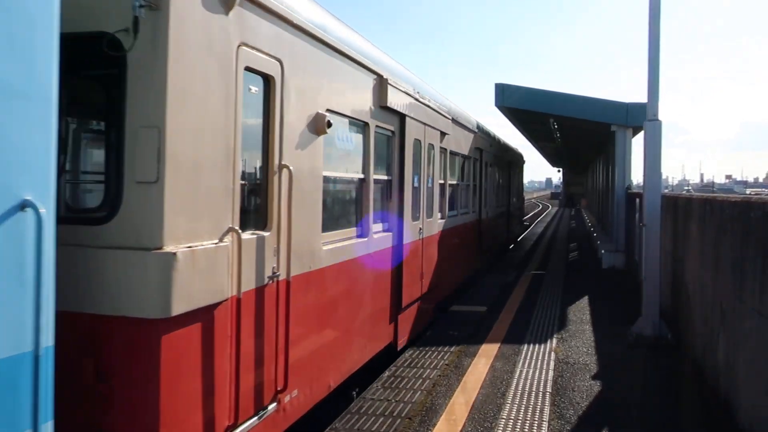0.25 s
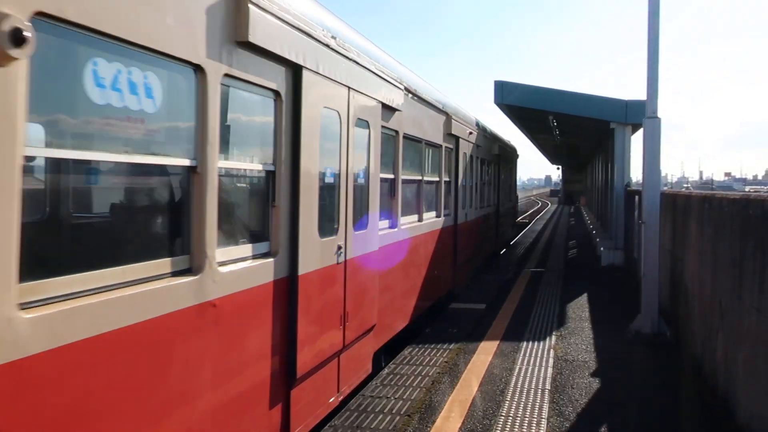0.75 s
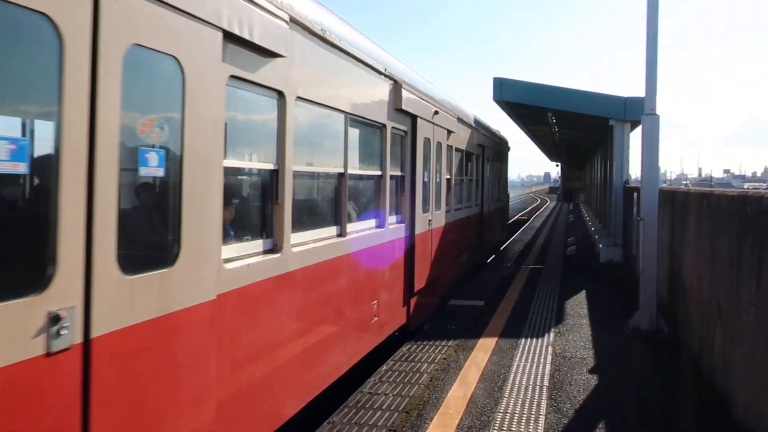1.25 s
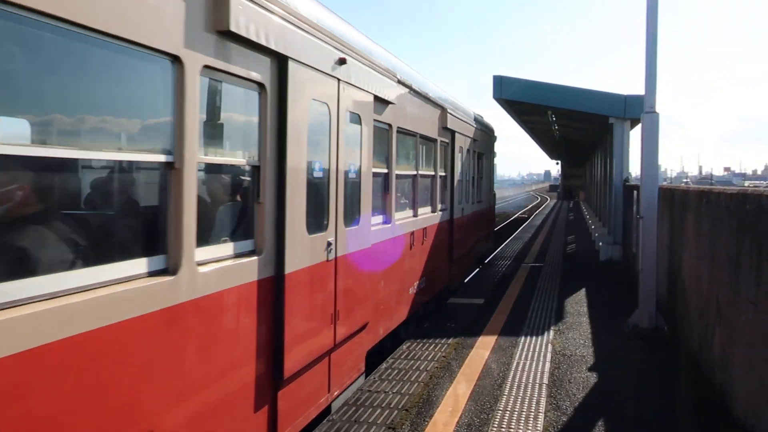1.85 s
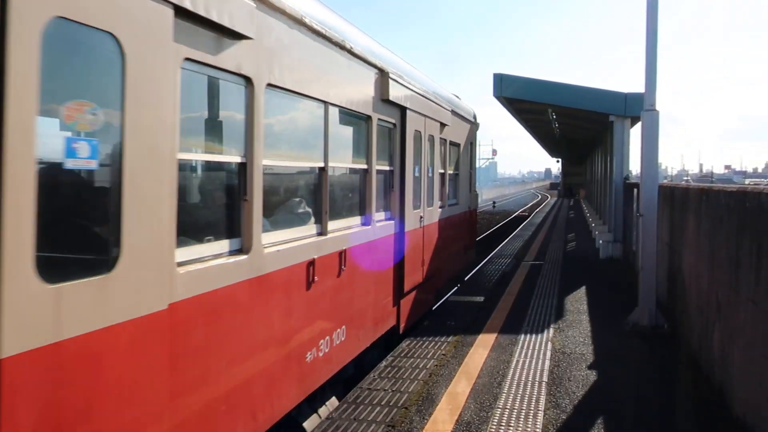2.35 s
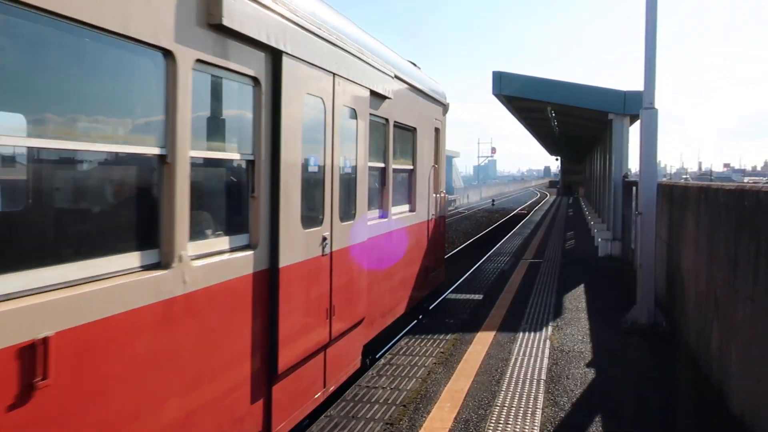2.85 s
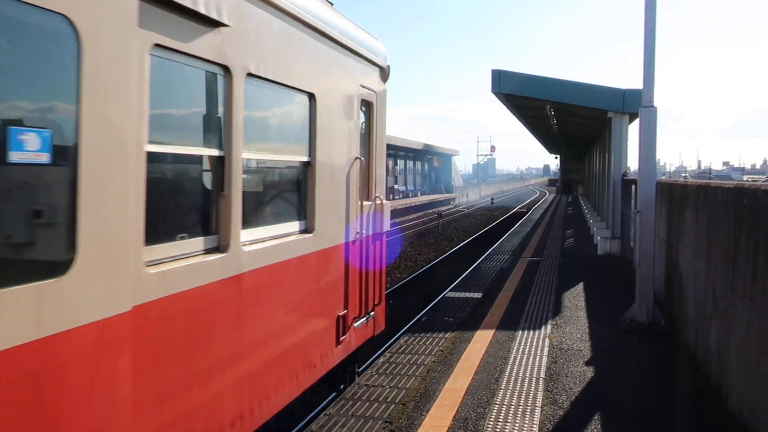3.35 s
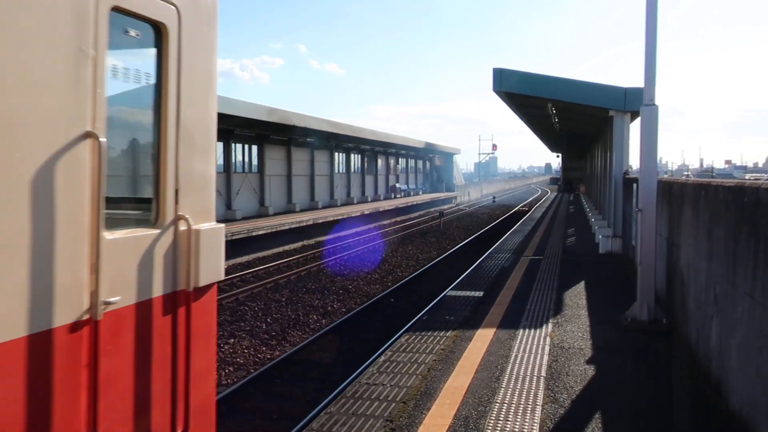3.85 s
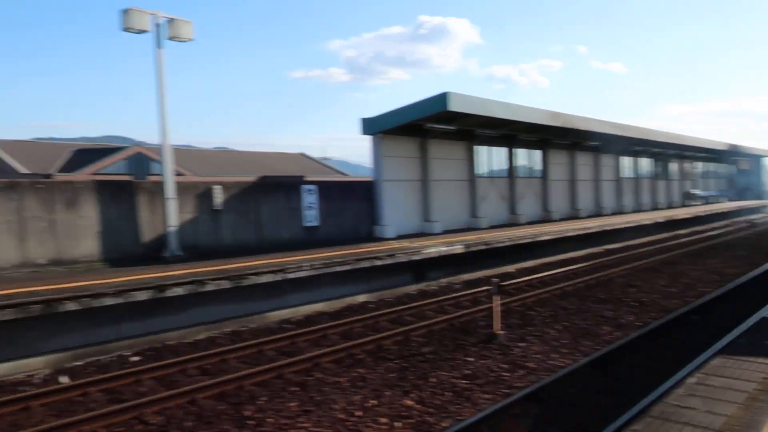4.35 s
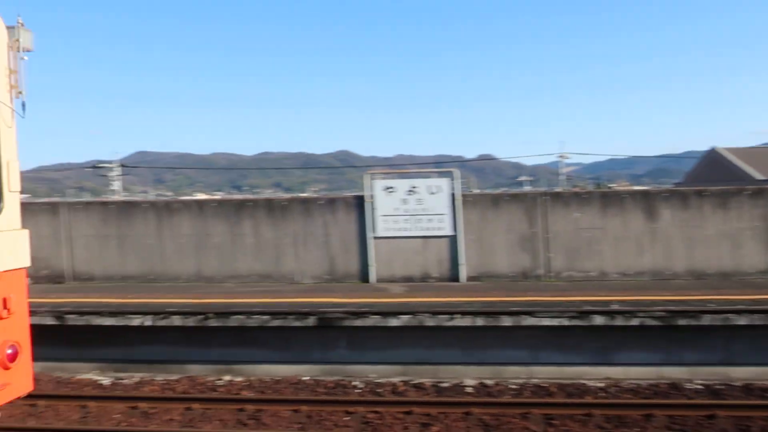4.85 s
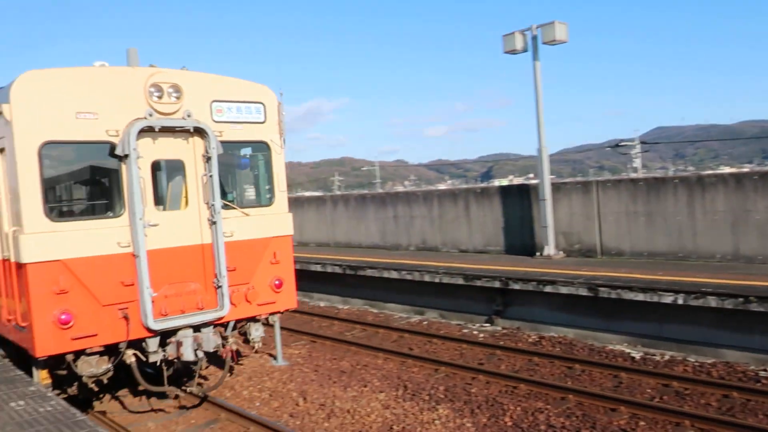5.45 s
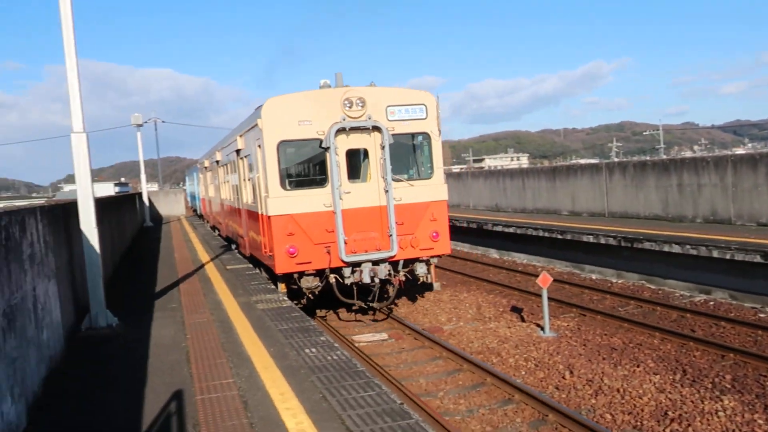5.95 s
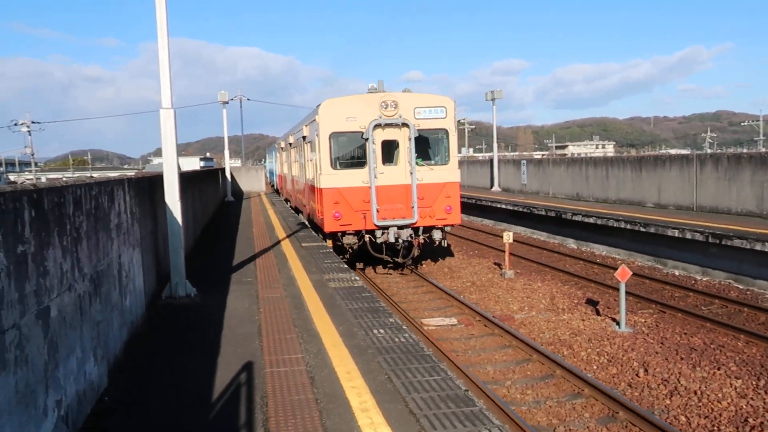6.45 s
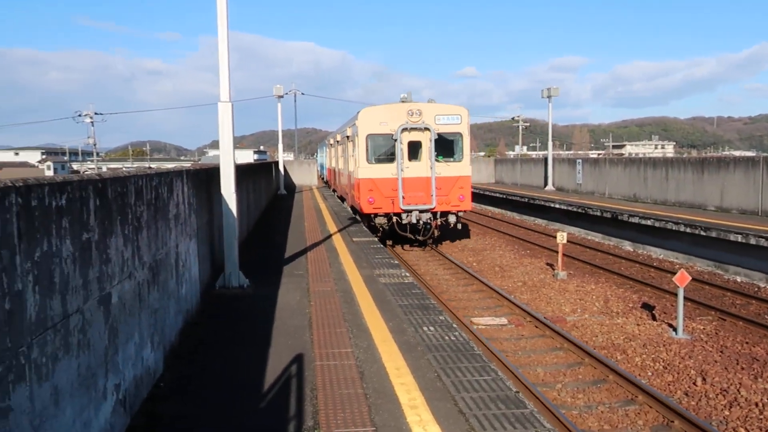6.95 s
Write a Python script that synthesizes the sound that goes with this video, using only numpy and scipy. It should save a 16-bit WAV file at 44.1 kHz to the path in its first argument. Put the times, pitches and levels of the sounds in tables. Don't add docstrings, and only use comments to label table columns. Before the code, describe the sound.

Loud close pass of diesel railcars heard from a platform edge. Two slightly mismatched engines drone and beat, swelling in booms, while rails and wheels rush, squeak and ring. A high airy whine peaks early. Gusts buffet the handheld microphone with low thuds, heaviest near the end, when automatic gain dips and wind filtering strips the bass, leaving a faint, narrow receding train.

```python
import sys
import numpy as np
from scipy import signal
from scipy.fft import rfft, irfft
from scipy.io import wavfile
from scipy.ndimage import uniform_filter1d

SR = 44100
rng = np.random.default_rng(int(sys.argv[2]) if len(sys.argv) > 2 else 0)


def nominal_scale(level):
    x = np.asarray(level, float) / 20
    return 10 ** x


def put_to_file(sound):
    columns = np.atleast_2d(sound).T
    safe = np.clip(columns, -1, 1)
    whole_steps = np.round(safe * 32767)
    wavfile.write(sys.argv[1], SR, whole_steps.astype(np.int16))


N = 317520
T = np.arange(N) / SR
F = np.fft.rfftfreq(N, 1 / SR)


def curves(table):
    s, *columns = np.transpose(table)
    return [np.interp(T, s, c) for c in columns]


def on_log(table, column):
    rows = np.array(table, float)
    return np.interp(np.log(F + 1), np.log(rows[:, 0]), rows[:, column])


def ramp(span_s):
    return np.interp(T, span_s, [0, 1])


def walk(rate_hz, size=N):
    hold = int(SR / rate_hz)
    steps = np.repeat(rng.standard_normal(size // hold + 1), hold)
    return 1.3 * uniform_filter1d(uniform_filter1d(steps, hold), hold)[:size]


def unit(x):
    return x / np.sqrt(np.mean(np.abs(x) ** 2))


def tone(turns, blur_hz, clean):
    size = len(turns)
    smear = unit(walk(blur_hz, size=size) + 1j * walk(blur_hz, size=size))
    carrier = np.exp(2j * np.pi * (turns + rng.random()))
    return np.sqrt(2) * np.real(carrier * (np.sqrt(clean) + np.sqrt(1 - clean) * smear))


WIND_CUT_S = 6.255


def wind_cut(x, hz, leak_db):
    on = np.clip((T - WIND_CUT_S) / 0.011, 0, 1)
    high = signal.sosfilt(signal.butter(4, hz, "high", fs=SR, output="sos"), x)
    return x + on * (1 - nominal_scale(leak_db)) * (high - x)


# start in s, hold in s, level in dB, extra rasp in dB.
GUSTS = [(1.053, 0.043, -18.5, 3), (1.216, 0.0093, -31.5, -2), (1.373, 0.0093, -29.5, 0.5),
         (1.472, 0.064, -20.5, 2), (2.0, .01, -25, -3), (2.36, 0.067, -24, -4), (2.552, 0.036, -29.5, -1),
         (2.673, 0.015, -28.5, -0.5), (2.923, .01, -32, -4), (3.368, 0.04, -33, -1),
         (3.48, 0.025, -21.5, 0), (3.658, .01, -29, -8), (3.803, .01, -31.5, 7), (3.853, .01, -23, -10),
         (4.05, 0.017, -26, 1), (4.494, 0.094, -18.5, 2.5), (4.653, 0.0085, -25.5, 9),
         (4.942, 0.0053, -22, 1), (5.1, 0.027, -17.5, 2.5), (5.25, 0.32, -27.5, 1), (5.557, 0.013, -25, -8),
         (5.693, 0.011, -28.5, -4), (5.865, 0.0084, -22.5, -7), (5.97, 0.12, -21, -8),
         (6.096, 0.035, -17.5, -2), (6.174, 0.046, -13.5, 1.5), (6.296, 0.17, -23.5, 5.5),
         (6.36, 0.03, -25, 2), (6.428, 0.085, -20, -0.5), (6.54, 0.012, -31, -3), (7.027, .01, -29, -7)]
GUST_RISE_DB_S, GUST_FALL_DB_S = 303, 166.5
BREEZE_DB, STILL_DB, BREEZE_STARTS_S, BREEZE_ENDS_S = -38.5, -46, .75, 6.55


def gusts(rasp=0):
    breezy = (T > BREEZE_STARTS_S) & (T < BREEZE_ENDS_S)
    db = np.where(breezy, BREEZE_DB, STILL_DB)
    for s, hold_s, gust_db, rasp_db in GUSTS:
        rise_db = GUST_RISE_DB_S * (s - T)
        fall_db = GUST_FALL_DB_S * np.maximum(T - s - hold_s, 0)
        db = np.maximum(db, gust_db + rasp * rasp_db - np.maximum(rise_db, fall_db))
    return db - np.clip(-35 - db, 0, None)


# start in s, peak in dB, ring
# in Hz, left minus right in dB, edge in dB.
POPS = [(.524, -8.5, 170, 0.5, -27), (1.031, -8.5, 120, -1, -25), (1.381, -8, 200, -10, -22),
        (1.472, -13.5, 220, 12, -23), (1.681, -4, 191, 0, -27), (2.875, -3, 197, 1.5, -22),
        (2.961, -5.5, 200, 2, -24), (3.048, -5, 201, 0, -23), (3.871, -4, 189, 0, -22),
        (4.128, -6.5, 120, 0, -25), (5.949, -9.5, 176, -11, -22), (6.202, -8, 282, 2, -28),
        (6.223, -11, 300, 0, -29), (6.297, -10, 420, 0, -27), (6.32, -20, 400, 0, -12),
        (6.513, -22, 450, -1, -27), (6.587, -21, 380, 0, -22), (2.631, -7.5, 162, 3, -10),
        (2.821, -2, 196, -0.5, -21), (2.979, -22, 170, 11, -6), (4.255, -25, 139, 3, -11),
        (6.027, -9, 141, 2, -18), (6.048, -2, 130, -8, -18), (6.153, -8.5, 124, 0, -31),
        (6.234, -7, 238, -6, -38), (6.391, -6.5, 375, 8, -15.5), (6.416, -7, 670, 5, -22),
        (6.453, -12, 470, -0.5, -27), (6.499, -11, 406, -0.5, -31), (7.011, -14.5, 320, -3, -22),
        (6.287, -18, 470, 0, -28), (6.35, -20, 330, 0, -25), (6.365, -18, 420, 0, -20),
        (6.382, -15, 330, 0, -25), (6.438, -20, 330, -2, -28), (6.445, -13, 380, 0, -29),
        (6.508, -17, 420, 0, -28), (6.543, -20, 330, 0, -28), (6.562, -21, 330, 0, -28),
        (6.579, -22, 342, 0, -28)]


def pops():
    ports = np.zeros((2, N))
    t = T[:900]
    edge_turns = 700 * t + 3.1 * (1 - np.exp(-t / 0.0023))
    edge = np.sin(2 * np.pi * edge_turns) * np.exp(-t / 0.0032)
    window = (1 - np.exp(-(t / .0009) ** 2)) * np.cos(np.pi / 2 * t / t[-1])
    for s, peak_db, hz, pan_db, edge_db in POPS:
        ring = np.sin(2 * np.pi * hz * t) * np.exp(-t * hz / 1.21)
        pop = (ring + nominal_scale(edge_db + 2.0) * edge) * window
        pan = np.array([[pan_db], [-pan_db]]) / 2
        start = int(s * SR)
        ports[:, start:start + len(t)] += nominal_scale(peak_db + 1.5 + pan) * pop
    return ports


# frequency in Hz, level in dB per Hz.
EDDY = [(15, -48.5), (40, -21.5), (100, 2), (220, 3.5), (460, -6.5), (620, -16.5), (900, -21), (1800, -36),
        (3000, -55), (6000, -130)]
RASP_HZ, GUST_CUT_HZ, PORT_TOP_HZ = 400, 296, 3500


def wind():
    lumps = [rng.standard_normal(N) * nominal_scale(2.4 * walk(90)) for _ in range(2)]
    pair = np.array([unit(irfft(rfft(v) * nominal_scale(on_log(EDDY, 1)), N)) for v in lumps])
    low = signal.sosfiltfilt(signal.butter(2, RASP_HZ, fs=SR, output="sos"), pair)
    gusty = low * nominal_scale(gusts()) + (pair - low) * nominal_scale(gusts(rasp=1.0))
    mid, side = wind_cut(gusty, GUST_CUT_HZ, -30)
    on = np.clip((T - WIND_CUT_S) * 50, 0, 1)
    mid, side = mid * nominal_scale(-5.0 * (1 - on)), side * nominal_scale(-7.0 * on)
    ports = np.array([mid + side, mid - side]) + pops()
    return signal.sosfilt(signal.butter(6, PORT_TOP_HZ, fs=SR, output="sos"), ports)


# start in s, depth in dB, recovery in s.
DUCKS = [(1.06, -3, 0.12), (1.49, -4, 0.052), (2.83, -2, 0.21), (3.5, -3.5, 0.068), (3.885, -2.5, 0.11),
         (5.13, -2, .08), (6.055, -3.5, 0.074)]


def ducking():
    db = 0
    for s, depth_db, back_s in DUCKS:
        db = db + depth_db * np.clip((T - s) * 100, 0, 1) * np.exp(-np.maximum(T - s, 0) / back_s)
    return nominal_scale(db)


GLINTS, GLINT_HZ, GLINT_S = 900, (900, 4600), (.025, .08)
GLINT_DB, GLINT_TILT_DB_OCT, GLINT_GLIDE = 6.5, -8, .02


def glints(gear_db):
    out = np.zeros(N + SR)
    for when, pitch, long, size, slide in rng.random((GLINTS, 5)):
        i = int(when * N)
        t = T[:int(np.interp(long, [0, 1], GLINT_S) * SR)]
        hz = GLINT_HZ[0] * (GLINT_HZ[1] / GLINT_HZ[0]) ** pitch
        db = gear_db[i] + GLINT_DB + GLINT_TILT_DB_OCT * np.log2(hz / 1600) - 8 * size
        turns = hz * t * (1 + GLINT_GLIDE * (slide - .5) * t / t[-1])
        out[i:i + len(t)] += nominal_scale(db) * np.hanning(len(t)) * np.sin(2 * np.pi * turns)
    return out[:N]


# centre in s, length in s, pitch in
# Hz, width in Hz, level in dB.
SQUEAKS = [(0.143, 0.26, 900, 140, -32), (0.395, 1.2, 3210, 900, -44.5), (1.05, .2, 810, 90, -30.5),
           (2.1, .7, 560, 150, -30.5), (1.299, 0.83, 748, 110, -33), (1.348, 0.071, 3930, 350, -44),
           (1.954, .5, 758, 90, -27), (2.1, 0.091, 232, 21, -26), (2.3, 0.32, 830, 80, -26),
           (2.401, 0.35, 250, 16, -27), (2.45, .4, 770, 120, -26.5), (2.757, 0.34, 753, 80, -26),
           (4.15, .8, 618, 150, -34.5), (3.059, 0.32, 1610, 330, -36), (3.4, .59, 378, 13, -29),
           (3.55, .4, 140, 26, -25.5), (3.679, .2, 280, 22, -25.5), (3.8, 0.55, 394, 24.8, -30),
           (3.841, 0.11, 1676, 880, -38), (4.348, 0.49, 410.6, 50, -32), (5.143, 0.14, 1650, 220, -35.5),
           (5.241, 0.094, 1604, 220, -33), (5.402, 1.03, 1657, 510, -37.5), (5.3, 1.1, 2750, 500, -44),
           (5.395, 1.3, 3400, 700, -48), (5.599, 1.53, 2396, 500, -43.5), (5.731, 0.087, 1596, 180, -33),
           (4.948, 0.5, 2900, 1500, -49), (5.764, 0.11, 2460, 270, -38), (5.826, 0.055, 1584, 107, -27),
           (5.859, .12, 3330, 430, -41.5), (5.918, 0.078, 1575, 113, -29.5), (6.206, 0.15, 380, 300, -25),
           (6.439, .32, 431, 400, -31), (6.202, 0.53, 1570, 240, -45.5), (6.899, 1.62, 1583, 160, -43.5),
           (0.969, .1, 2300, 1800, -37), (1.335, 0.18, 1750, 500, -36), (3.943, .18, 2600, 1400, -47),
           (.3, 0.44, 1560, 150, -36)]
RING_WANDER = .012


def squeaks():
    out = np.zeros(N)
    for s, length_s, hz, width_hz, db in SQUEAKS:
        near = np.abs(T - s) < 1.2 * length_s
        turns = np.cumsum(hz * (1 + RING_WANDER * walk(9, size=near.sum()))) / SR
        swell = np.exp(-((T[near] - s) / length_s * 2) ** 2)
        out[near] += nominal_scale(db) * swell * tone(turns, width_hz, 0)
    return out


# low edge in Hz, high edge in Hz.
ROAR_BANDS = [(30, 400), (600, 1000), (1200, 2200), (2500, 5000)]
# frequency in Hz, level in dB per Hz, side minus mid in dB, side lead in radians.
COLOUR = [(22, -58.5, -51, -1), (40, -49, -53, -1), (170, -48.5, -36.5, -1), (388, -51.5, -22.5, -.5),
          (560, -58.5, -21, 0), (748, -54.5, -20.5, .2), (1020, -62.5, -12.5, .4), (1280, -66.5, -9.5, .5),
          (1575, -64, -6, .7), (2330, -73, -8, 1), (3450, -82.5, -2.5, 1.2), (5370, -96, 3.5, 1.3),
          (6770, -104, 5, 1.3), (14700, -125, 15, 1.3)]
# time in s, share of the side that comes from the left 0-1, width in dB.
AIM = [(0, .45, 2), (1, 0.4, -0.5), (2.4, 0.1, -1), (3.2, 0.6, 2.5), (3.7, .75, 2.5), (4.8, 1, 3),
       (5.5, 1, 0.5), (6.6, 0.1, -2.5), (7.2, 0.05, -7.5)]
SHIELD_S, SHIELD_DB = (2.55, 2.85, 3.75, 4.05), (-4.5, -15, 4.5)
TREBLE_PER_WHINE, TREBLE_DB = 0.37, 1.5


def roar(turns, levels):
    left, width_db = curves(AIM)
    left = np.clip(left, 0, .95)
    bass_db = np.interp(T, SHIELD_S, np.array(SHIELD_DB)[[0, 1, 1, 2]])
    top_db = TREBLE_DB + TREBLE_PER_WHINE * np.clip(curves(WHINE)[1] + 56, 0, None)

    white = rng.standard_normal((2, N))
    mid = rfft(white[0])
    leading = irfft(mid * np.exp(1j * on_log(COLOUR, 3)), N)
    gain = nominal_scale(on_log(COLOUR, 1))
    side = rfft(left * leading + np.sqrt(1 - left ** 2) * white[1])
    pair = np.array([mid * gain, side * gain * nominal_scale(on_log(COLOUR, 2))])

    lift = []
    for db, (low_hz, high_hz) in zip(levels, ROAR_BANDS):
        power = np.sum(gain[(F > low_hz) & (F < high_hz)] ** 2) * 2 / N
        lift.append(db - 10 * np.log10(power))
    lift = [lift[0] + bass_db] + lift + [lift[-1] + top_db]
    centres = np.log2([80, 200, 780, 1600, 3500, 6500])

    knock = sum(depth * np.cos(2 * np.pi * k * turns) for k, depth in ((6, 0.046), (4, 0.063), (3, 0.028)))
    octave, shared, out = np.log2(F + 1), walk(11), 0
    for c in np.arange(4.5, 14.1, .5):
        mask = np.cos(np.pi * np.clip(octave - c, -.5, .5)) ** 2
        share = [np.interp(c, centres, row) for row in np.eye(6)]
        db = sum(w * g for w, g in zip(share, lift) if w)
        db = db + 0.52 * shared + 0.83 * walk(14) + 1.2
        out = out + irfft(pair * mask, N) * nominal_scale(db) * (1 + knock * (c > 8))
    return out * [np.ones(N), nominal_scale(width_db)]


# time in s, pitch in Hz, level in dB, side over mid in dB.
WHINE = [(0, 5850, -48.5, -2), (.7, 5750, -49, -5), (1.4, 5760, -45, -4), (2.1, 5840, -43.5, 3),
         (2.6, 5900, -39, 1), (3.1, 5820, -46.5, 8), (4.2, 5810, -49.5, 4.5), (5.0, 5800, -50, 3.5),
         (5.95, 5750, -54, -3), (6.2, 5720, -73, 11), (7.2, 5830, -65, 12)]
WHINE_DB, WHINE_FLICKER_DB, WHINE_SWAY_HZ = -9.5, 3.2, 30.06
UPPER_DB, UPPER_MID_DB = -16, -7.5


def turbo():
    hz, db, side_db = curves(WHINE)
    turns = np.cumsum(hz) / SR
    sway = np.cumsum(WHINE_SWAY_HZ * walk(12)) / SR
    whine = []
    for _ in range(2):
        level_db = db + WHINE_DB + WHINE_FLICKER_DB * walk(45)
        whine.append(nominal_scale(level_db) * tone(turns + sway, 210, 0))
    upper = nominal_scale(db + UPPER_DB + 2 * walk(8)) * tone(1.5 * turns, 600, 0)
    return np.array([whine[0] + nominal_scale(UPPER_MID_DB) * upper, nominal_scale(side_db) * (whine[1] + upper)])


# multiple of the cycle rate, level in dB.
ORDERS_DB = [(3, -41), (4, -39), (5, -44.5), (7, -50), (9, -46.5), (10, -36.5), (11, -43.5), (13, -46),
             (14, -45), (16, -41.5), (19, -37), (21, -43), (22, -39.5), (24, -42), (25, -53), (27, -53.5),
             (30, -56), (32, -46.5), (33, -48), (36, -42)]
BOOMS = {6: [(1.3, 1.7, -30), (2.4, 0.67, -28), (3.35, 0.52, -28), (4.12, 0.3, -19.5), (5.35, 0.67, -22.5)],
         8: [(.4, 1.0, -26), (1.0, 0.27, -21.5), (1.9, 0.96, -26.5), (4.35, 0.56, -35.5), (5.6, 0.94, -26)],
         12: [(.55, 0.74, -28), (2.75, 0.28, -27), (3.15, 0.46, -29), (3.5, 0.37, -26), (4.2, 0.85, -20),
         (4.48, 0.11, -27), (4.8, 0.42, -23.5), (5.95, 0.35, -24.5), (6.95, 0.87, -39.5)],
         15: [(1.1, 0.5, -45), (2.0, 0.83, -25), (2.7, 0.37, -24.5), (3.33, 0.63, -17.5), (4.5, 0.24, -22),
         (5.0, 0.17, -26), (5.7, .8, -26), (7.0, 1.1, -40.5)], 18: [(.55, 0.89, -27), (1.68, 0.61, -16.5),
         (2.8, 0.36, -18), (3.6, 0.85, -21.5), (4.05, 0.24, -26), (5.4, 0.67, -25.5)],
         20: [(0, 0.96, -31.5), (1.3, 1, -30.5), (2.4, .5, -23.5), (3.05, 0.35, -23), (4.2, 0.73, -40)]}
DRONE_FADE_S, DRONE_FADE_DB = (6.13, 6.27), -21.5
SLOW = 8


def engine(speed, strong, rumble_db):
    hz, = curves(speed)
    turns = np.cumsum(hz) / SR
    t, slow_turns, out = T[::SLOW], turns[::SLOW], 0
    fade_db = DRONE_FADE_DB * ramp(DRONE_FADE_S)[::SLOW]
    for k, db in strong.items():
        power = nominal_scale(db + fade_db) ** 2
        for s, length_s, boom_db in BOOMS[k]:
            power = power + nominal_scale(boom_db) ** 2 * np.exp(-((t - s) / length_s * 2.23) ** 2)
        out = out + np.sqrt(power) * nominal_scale(1) * tone(k * slow_turns, 16 * SLOW, .86)
    for k, db in ORDERS_DB:
        drift_db = np.interp(t, np.arange(0, 8, .4), 3 * rng.standard_normal(20))
        level = nominal_scale(db + drift_db + rumble_db[::SLOW] + 3)
        out += level * np.sin(2 * np.pi * (k * slow_turns + rng.random()))
    return signal.resample_poly(out, SLOW, 1)[:N], turns


# time in s, cycle rate in Hz.
FRONT_SPEED = [(0, 11.38), (3.75, 11.72), (4.3, 11.55), (5.2, 11.42), (7.2, 11.44)]
REAR_SPEED = [(0, 11.33), (2.75, 11.59), (3.85, 11.445), (4.8, 11.53), (7.2, 11.48)]
FRONT_ORDERS = {6: -30, 8: -34.5, 12: -29.5}
REAR_ORDERS = {15: -36.5, 18: -35, 20: -39.5}
# time in s, overall level in dB, running gear in view in dB.
TRAIN = [(0, -17, -38.5), (.3, -16, -39.5), (.9, -16, -41.5), (1.34, -15.5, -40), (1.54, -16, -42.5),
         (1.8, -16, -41.5), (2.1, -14.5, -42), (2.63, -16, -39), (2.95, -18.5, -42.5), (3.41, -14, -44),
         (3.7, -16.5, -45), (4.41, -18.5, -47.5), (4.65, -20, -49), (5.27, -21.5, -42.5),
         (5.94, -20, -37.5), (6.1, -24, -43), (6.3, -34.5, -51), (7.2, -30, -42.5)]
BOOM_OVER_HISS_DB, RING_OVER_HISS_DB = 14, 7.5
FACING_S, FACING_BOOM_DB, FACING_RING_DB = (5.26, 6.4), -9, -5.5


def scene():
    level_db, gear_db = curves(TRAIN)
    facing = ramp(FACING_S)
    front, turns = engine(FRONT_SPEED, FRONT_ORDERS, level_db + 19)
    rear, _ = engine(REAR_SPEED, REAR_ORDERS, level_db + 19)
    drone = front + rear
    boom_db = gear_db + BOOM_OVER_HISS_DB + FACING_BOOM_DB * facing
    ring_db = gear_db + RING_OVER_HISS_DB + FACING_RING_DB * facing
    mid, side = roar(turns, [level_db - 5.5, boom_db, ring_db, gear_db]) + turbo()
    mid = mid + drone + squeaks() + glints(gear_db)
    side = side + nominal_scale(-40.5) * np.roll(drone, 40)
    return np.array([mid + side, mid - side]) * ducking() + wind()


def top_cut(x):
    return signal.sosfilt(signal.butter(12, 14700, fs=SR, output="sos"), x)


WIND_CUT_HZ, MONO_HZ, CEILING = 126, 534, .86


def record(dry):
    mid = wind_cut((dry[0] + dry[1]) / 2, WIND_CUT_HZ, -20.5)
    side = wind_cut((dry[0] - dry[1]) / 2, MONO_HZ, -44)
    out = np.array([mid + side, mid - side])
    out = out / (1 + (out / CEILING) ** 4) ** .25 * ramp((0, .003))
    return top_cut(out)


dry = scene()
out = record(dry)
put_to_file(out)
```